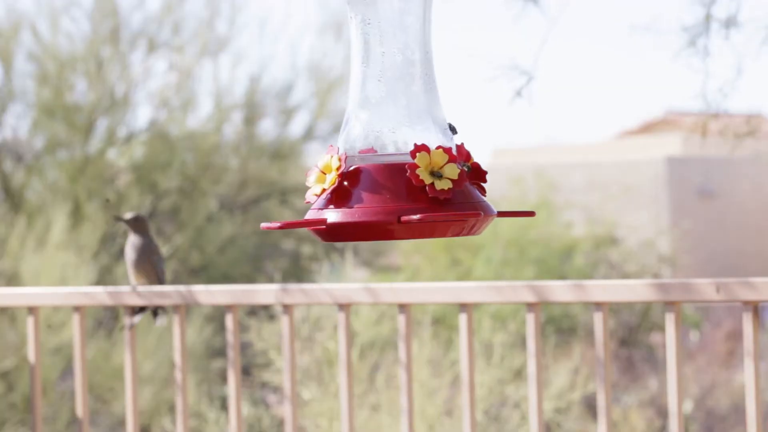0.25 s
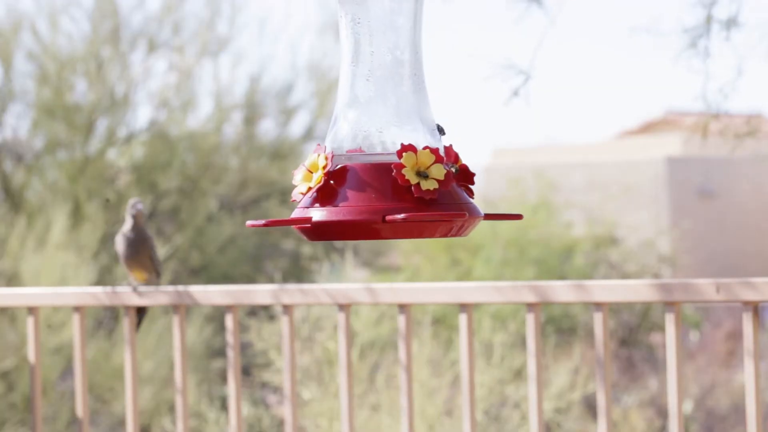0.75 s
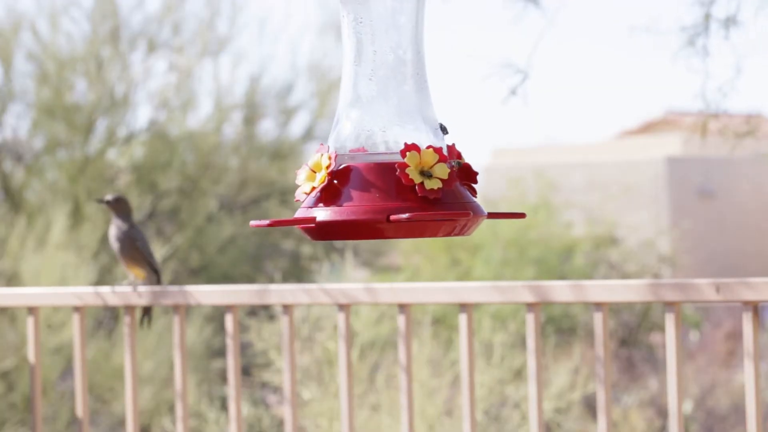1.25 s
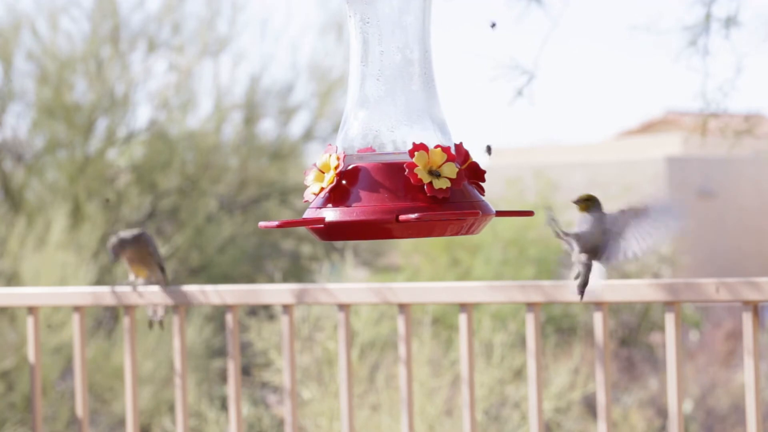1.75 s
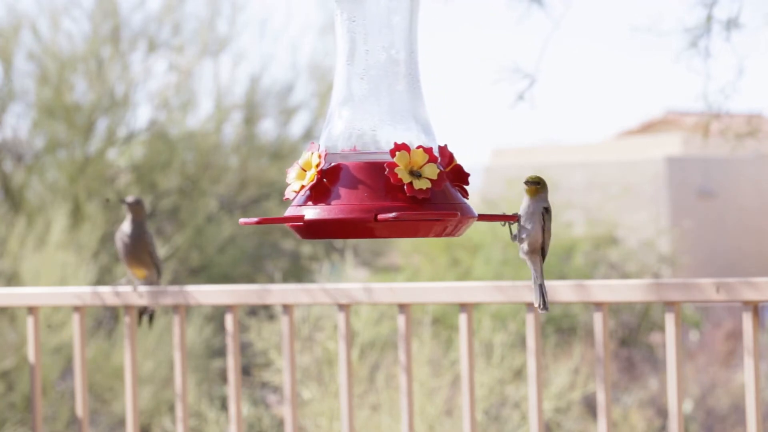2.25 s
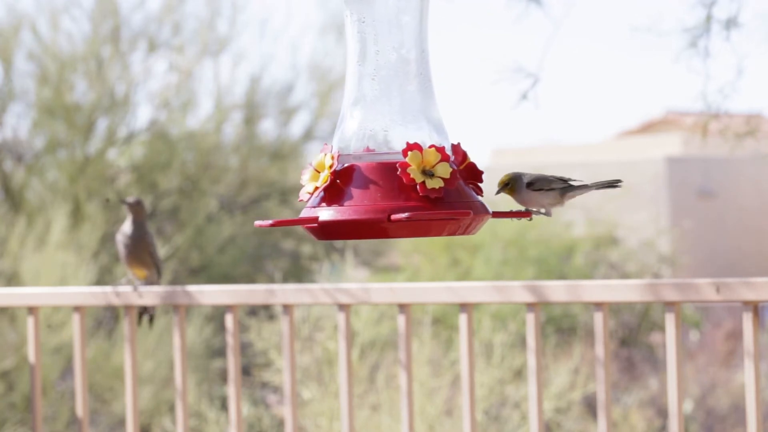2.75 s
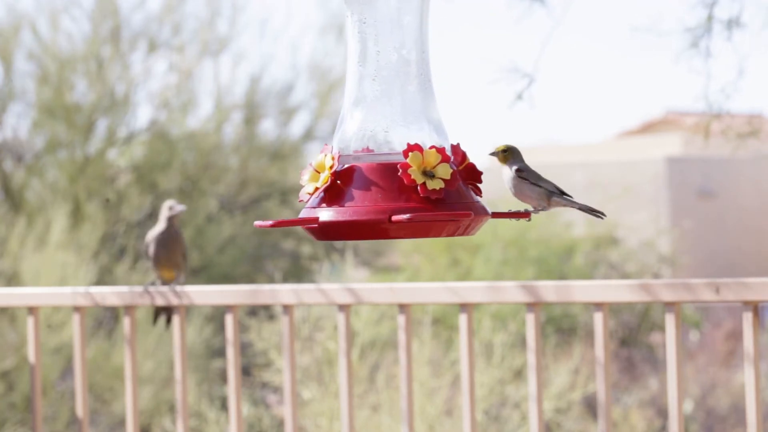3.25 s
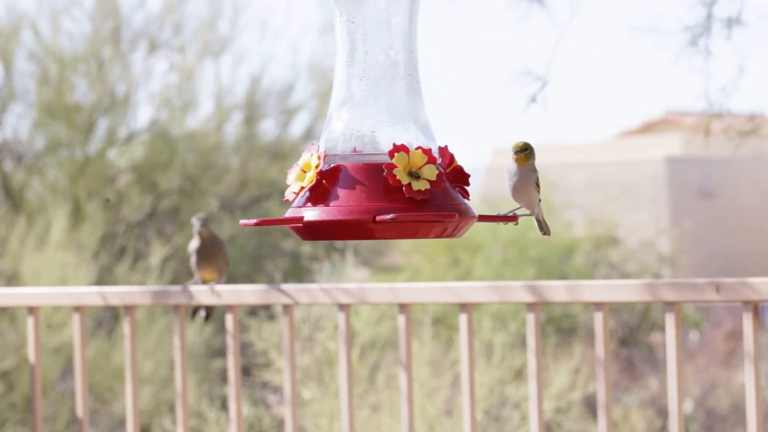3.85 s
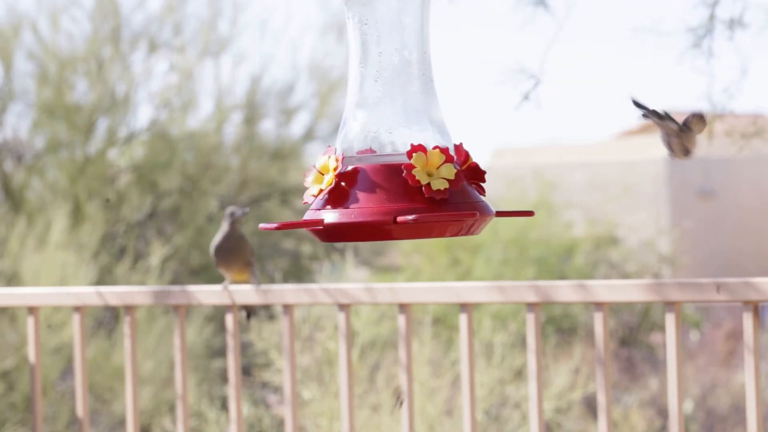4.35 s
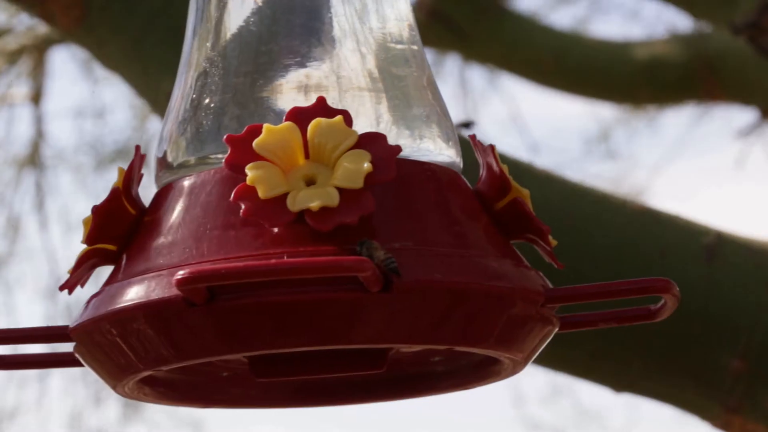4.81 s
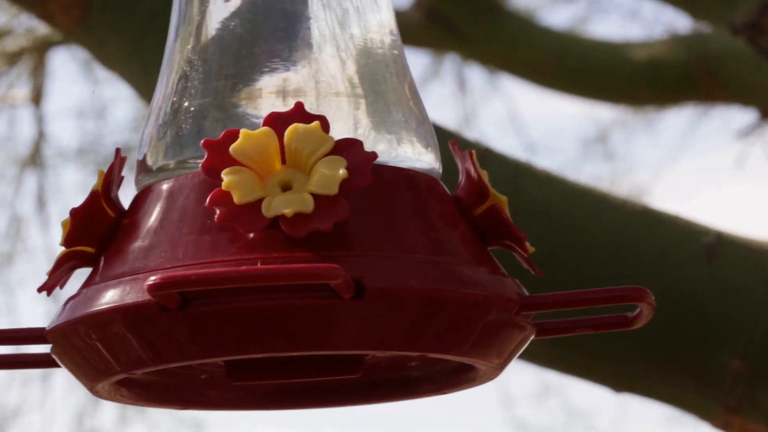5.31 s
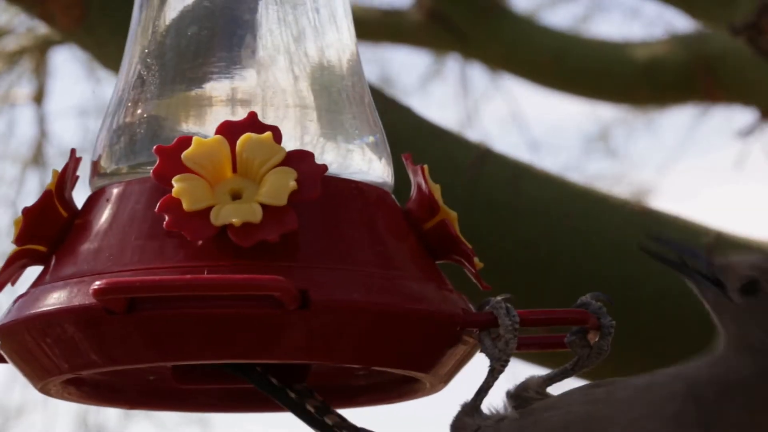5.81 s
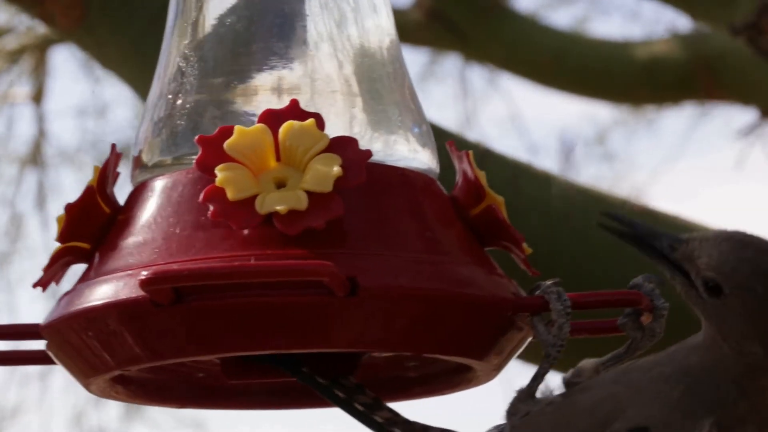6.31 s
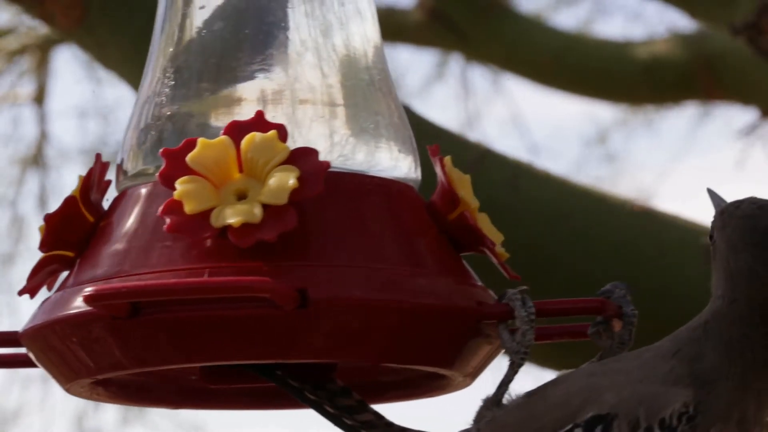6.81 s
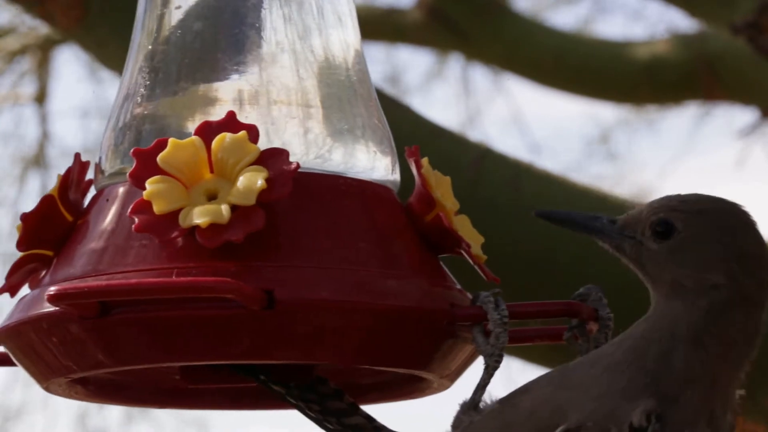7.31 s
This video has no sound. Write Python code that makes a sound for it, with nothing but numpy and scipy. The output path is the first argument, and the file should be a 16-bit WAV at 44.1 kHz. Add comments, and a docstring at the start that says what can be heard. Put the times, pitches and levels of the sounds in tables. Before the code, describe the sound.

A woodpecker yips sharply in evenly spaced series, echoing in a walled yard, with small claw ticks, light wind, then a closer, louder series.

```python
"""A woodpecker yips in three quick series in a walled yard: harmonic stacks filtered by throat and beak.
The walls return each yip as scattered echoes and a decaying tail. Small birds whistle and warble as gliding
tones, and a farther bird coos twice. Claws ring a rail, feathers rustle as noise grains and wind slaps the
microphone, over shaped noise for wind, distant traffic, a narrow drone and hiss.
The sound drops out for an instant before the last, closer series."""
import sys
import numpy as np
from scipy import signal
from scipy.io import wavfile
from scipy.ndimage import uniform_filter1d

SR = 44100
rng = np.random.default_rng(int(sys.argv[2]) if len(sys.argv) > 2 else 0)


def persist_wave(psi):
    """Save psi, clipped to +-1, as 16-bit WAV."""
    counts = np.round(np.clip(psi, -1, 1) * 32767).astype(np.int16)
    wavfile.write(sys.argv[1], SR, np.atleast_2d(counts).T)


def undo_db(level):
    """Turn decibels back into plain size, where 20 dB means ten times bigger."""
    steps = np.asarray(level, float) / 20
    return 10 ** steps


N = 333837
LEAD = SR // 2  # samples before time zero, so that an earlier yip still rings
DROPOUT_S, DROPOUT_LENGTH_S = 4.733, .006  # middle and length of the silence

# Woodpecker yips: t/s, held length/s, nominal start f/Hz, nominal top f/Hz, mid-note dip as a fraction of pitch,
# base level/dB, slope of the tail/(dB per s)
YIPS = [(-.107, 0.085, 1450, 1473, 0.04, -23.5, -700), (.155, .078, 1479, 1487, 0.02, -24, -450),
        (0.414, .072, 1427, 1505, 0.01, -23.5, -250), (.641, 0.07, 1396, 1418, 0, -20, -300),
        (0.87, 0.071, 1306, 1381, 0.01, -23, -300), (1.099, 0.074, 1331, 1376, 0.01, -23.5, -350),
        (1.339, .072, 1310, 1337, 0.02, -24.5, -400), (1.587, 0.07, 1327, 1388, 0.02, -23.5, -350),
        (1.831, .069, 1332, 1416, 0.02, -23.5, -250), (2.085, 0.072, 1345, 1343, 0.02, -25.5, -450),
        (3.196, .057, 1349, 1450, 0, -22, -450), (3.442, 0.07, 1359, 1420, 0.04, -23, -400),
        (3.687, 0.073, 1371, 1409, 0.01, -24, -300), (3.923, 0.076, 1457, 1453, 0.03, -23.5, -300),
        (4.171, .069, 1421, 1492, 0.04, -24, -250), (4.419, .072, 1400, 1505, 0.05, -24, -220),
        (5.286, .072, 1557, 1530, 0.03, -14.5, -700), (5.491, 0.084, 1453, 1539, 0.03, -15.5, -330),
        (5.723, 0.077, 1408, 1486, 0.02, -14.5, -270), (5.956, 0.074, 1464, 1524, 0.03, -14.5, -150),
        (6.185, 0.072, 1459, 1460, 0.01, -15, -200), (6.416, 0.074, 1415, 1502, 0.02, -16, -200),
        (6.655, 0.076, 1477, 1485, .01, -15.5, -300)]
# Colour of each yip, perhaps as the head turns: lift of the fundamental/dB, second harmonic/dB, treble/dB
YIP_COLOURS = [(3.5, -14, 5), (8.5, -8.5, 14.5), (6.5, -4.5, 11), (3, -10, 7.5), (5, -8.5, 9.5), (7, -7, 8),
               (8.5, -12.5, 7), (7, -9.5, 5.5), (7.5, -8, 7.5), (7, -12, 11), (8, -11, 12),
               (8.5, -8.5, 9.5), (8, -5.5, 8.5), (6.5, -5.5, 9.5), (5, -7.5, 10), (6, -5, 11),
               (-0.2, -13, 2.5), (8, -10, 1), (5, -10.5, -3.5), (6, -4.5, 3.5), (8, -6.5, 3),
               (7.5, -5.5, 5.5), (7.5, -6, 3)]
# Where those lifts apply: f/Hz of fundamental, second harmonic, main resonance (no lift), treble
LIFT_HZ = [1420, 3090, 3740, 8360]
# Resonances of throat and open beak: f/Hz, relative level/dB
THROAT = [(400, -20), (1420, -13), (2100, -3.5), (2850, -1), (4250, 1), (5700, -17), (7100, -27.5),
          (8500, -15.5), (9900, -35.5), (11400, -23), (12800, -29), (16000, -43)]
EFFORT_DB_PER_SEMITONE = 3.0  # effort raises pitch and level together
OPENING_DB, OPENING_S = -4, 0.026  # the note starts softer and fills out
FIRST_CREST, LAST_CREST = .2, 0.863  # shares of the held note; the rise levels off at the second
# Pairs below are (far, close): the pitch bends over just before the end, then drops
BEND_S, DROP_S, DROP_BEND = .005, (.015, .016), 2.41
SLACK_HZ, SINK_HZ_PER_S = 859.4, (6000, 4500)  # slack membranes sink on from there
SHUT_DB, TAIL_S = -3, (.043, .053)  # loss as the beak shuts; length of the tail
MUFFLE_S, MUFFLE_DB_PER_S = 0.017, -900  # the shut beak dulls the late tail: extra fade at 8 kHz
FAR_LOSS_DB = 5  # treble that the air takes from the far series at 12 kHz

# Decay of the yard: f/Hz, t60/s
YARD_DECAY = [(500, 0.14), (1500, 0.49), (4500, 0.35), (9000, 0.16), (15000, 0.17)]
# Wall echoes: delay/s, level before gusts and send/dB
WALLS = [(.007, -8.5), (0.054, -37), (0.109, -52), (.29, -45.5)]
CLOSE_YARD_DB = -12  # the yard is weaker against the close series

# Coos of a farther bird: t/s, length/s, start f/Hz, top f/Hz, base level/dB
COOS = [(3.91, .19, 788, 855, -42), (4.142, .19, 699, 826, -40)]
# Harmonics of a coo, from the first: mean relative level/dB
COO_ORDERS_DB = [0, -8, -15]
COO_PEAK, COO_FADE_DB = .33, -15  # share of the length where pitch and level top out; level of the long fade

# Whistled notes of small birds: t/s, length/s, start f/Hz, end f/Hz, level/dB
WHISTLES = [(1.259, 0.02, 8600, 2550, -39), (1.312, 0.013, 8300, 3700, -53.5)]
WARBLE_START_S, WARBLE_END_S = 2.865, 3.09  # first and last note onsets
WARBLE_LOW_HZ, WARBLE_HIGH_HZ, WARBLE_DB = 3300, 5100, -64  # range of starting pitch; loudest note

# Claw ticks: t/s, level/dB, ring f/Hz, treble snap against the ring before a 15 dB cut/dB
TICKS = [(.066, -35, 3240, 4.5), (.333, -34.5, 3250, -5), (1.249, -34, 3200, -16), (2.215, -30, 3340, -3),
         (2.787, -33.5, 3090, 1.5), (2.983, -33, 3130, 2), (3.402, -35, 3120, 2), (3.824, -29.5, 3440, -2),
         (3.854, -33, 3300, 4), (4.605, -34.5, 3330, 5.5), (5.105, -54, 4200, 29.5),
         (5.111, -39.5, 4140, 13), (5.626, -48, 2400, 35), (7.539, -26, 2340, -2.5),
         (7.564, -26.5, 2340, -11)]
# Modes of the rail: multiple of the ring f, relative level/dB, t60/s
RAIL_MODES = [(1.0, 0, .011), (1.13, -6, .025), (.75, -8, .008)]
# Feathers settling on the feeder
RUSTLE_START_S, RUSTLE_END_S, RUSTLE_PER_S, RUSTLE_GAIN_DB = 5.3, 5.75, 500, -62
# Wind slaps on the microphone: t/s, level/dB, f/Hz
SLAPS = [(2.352, -30, 55), (7.228, -25, 105), (7.39, -29, 110), (7.47, -28, 95), (7.53, -28, 120)]

# Course of the background: t/s, wind level/dB, traffic level/dB
AIR_LEVELS = [(0, -41.5, -50.5), (.6, -45, -50), (3.1, -45.5, -52.5), (4.101, -49, -47.5),
              (4.72, -47.5, -50), (4.74, -42.5, -48), (5.6, -47.5, -46.5), (6.8, -46, -47),
              (7.15, -41.5, -40), (7.57, -34.5, -43.5)]
# Spectrum of the wind: f/Hz, relative level per Hz/dB
WIND = [(15, -17), (45, -9), (76, -5), (113, 0), (200, -8.5), (270, -11), (400, -21.5), (800, -95)]
# Spectrum of the traffic: f/Hz, relative level/dB
TRAFFIC = [(200, -20), (300, -8), (420, 1.5), (950, 5), (1700, -4.5), (3000, -25.5), (4500, -22.5),
           (6000, -62.5)]
# Spectrum of the hiss: f/Hz, relative level/dB
HISS = [(2500, 12.5), (5500, -3), (7000, -3), (11000, 1.5), (14000, -1), (16000, -16.5)]
# Bands of the drone: f/Hz, width/Hz, relative level/dB
DRONE = [(2370, 240, 0), (3500, 160, -14), (104, 14, 8), (240, 20, 2)]
DRONE_DB, HISS_DB = (-55.5, -52), (-59.5, -60.5)  # (before, after the dropout)


def evened(x):
    """Normalisation: scales a signal to rms 1."""
    return x / np.sqrt(np.mean(x ** 2) + 1e-20)


def read(points, hz):
    """Interpolates a spectrum table along a logarithmic frequency axis."""
    f, value = np.transpose(points)
    return np.interp(np.log(hz + 1), np.log(f + 1), value)


def add(mix, s, sound):
    """Superposition: adds a sound to the mix at time s."""
    part = mix[round(s * SR) + LEAD:][:len(sound)]
    part += sound[:len(part)]


def wobble(shape, size):
    """Low-pass random modulation: twice-smoothed noise of rms 1 along the last axis."""
    smooth = uniform_filter1d(rng.standard_normal(shape), size)
    return evened(uniform_filter1d(smooth, size))


def yip(start, held, start_hz, top_hz, dip, db, fade_db, colour):
    """Source and filter: harmonics pass the throat; a hoarse start, a held note, a drop as the beak shuts."""
    close = int(start > DROPOUT_S)
    t = np.arange(0, held + TAIL_S[close], 1 / SR)
    u = np.minimum(t / held, 1)
    after = np.maximum(t - held + BEND_S, 0)

    note = start_hz + (top_hz - start_hz) * np.sin(np.pi / 2 * u / LAST_CREST)
    note *= 1 - dip * np.sin(np.pi * (u - FIRST_CREST) / (LAST_CREST - FIRST_CREST)) ** 2
    openness = np.exp(-(after / DROP_S[close]) ** DROP_BEND)
    effort_db = EFFORT_DB_PER_SEMITONE * 12 * np.log2(note / note.mean())
    level_db = db + effort_db + OPENING_DB * np.exp(-t / OPENING_S)
    level_db += SHUT_DB * (1 - openness) + fade_db * after

    sinking = SLACK_HZ - SINK_HZ_PER_S[close] * after
    pitch = openness * note + (1 - openness) * sinking
    pitch = uniform_filter1d(pitch, size=200, mode="nearest")
    slack = 1 - pitch / pitch.max()  # loose membranes jitter and hiss
    hoarse = np.exp(-t / .006)
    jitter = (.0015 + .04 * slack + .06 * hoarse) * wobble(len(t), size=40)
    pitch = pitch * (1 - .1 * hoarse + jitter)

    order = np.arange(1, 26)[:, None]
    hz = order * pitch
    beak = (1 - slack) ** (.4 if close else .2)  # resonances sink as the beak shuts
    fundamental_db, second_db, treble_db = colour
    lift = np.transpose([LIFT_HZ, [fundamental_db, second_db, 0, treble_db]])
    colour_db = read(THROAT, hz / beak) + read(lift, hz)
    colour_db -= (not close) * FAR_LOSS_DB * (hz / 12000) ** 2
    colour_db += MUFFLE_DB_PER_S * np.maximum(after - MUFFLE_S, 0) * (hz / 8000) ** 2
    colour_db -= 12 * hoarse * (hz / 8000) ** 2  # the treble comes in late

    # moving air shakes the far sound more
    flutter_db = (.5 if close else .8) * order ** .75 * wobble((25, len(t)), size=300)
    flutter_db = flutter_db - 0.1 * flutter_db.var(1, keepdims=True)  # offsets the mean power gain
    gains = undo_db(colour_db + flutter_db) * (hz < .45 * SR)
    gains /= np.sqrt((undo_db(colour_db) ** 2).sum(0) / 2)
    breath_depth = .025 + (.4 if close else .55) * slack + .9 * hoarse
    breath = 1 + breath_depth * np.sqrt(order) * wobble(gains.shape, size=12)
    phase = order * (2 * np.pi * np.cumsum(pitch) / SR + 0.281 * order)
    stack = gains * breath * np.cos(phase)
    edges = np.minimum(t / .009, 1) * np.minimum((t[-1] - t) / .022, 1)
    return start, undo_db(level_db) * stack.sum(0) * edges


def yard(x):
    """Reverberation: rough wall echoes, and a sparse random tail that decays band by band."""
    taps = np.zeros(SR)
    at = np.arange(200, SR - 20, 20)
    taps[at + rng.integers(0, 20, len(at))] = rng.choice([-1., 1.], len(at))
    hz, t, z = signal.stft(taps, SR, nperseg=256)
    decay = undo_db(-60 * t / read(YARD_DECAY, hz)[:, None])
    tail = signal.istft(z * decay, SR, nperseg=256)[1]
    tail *= undo_db(-17) / np.linalg.norm(tail)
    for delay, db in WALLS:
        scatter = rng.standard_normal(300) * np.exp(-np.arange(300) / 80)  # each wall smears over a few ms
        tail[round(delay * SR):][:300] += undo_db(db) * scatter / np.linalg.norm(scatter)
    send = np.where(np.arange(len(x)) > DROPOUT_S * SR + LEAD, undo_db(CLOSE_YARD_DB), 1)
    gusts = undo_db(3.0 * wobble(len(x), size=250))  # moving air breaks up the echoes
    return x + gusts * signal.fftconvolve(x * send, tail)[:len(x)]


def coo(s, length, start_hz, top_hz, db):
    """Additive synthesis: a few fluttering low harmonics rise to their pitch, swell and fade."""
    t = np.arange(0, length, 1 / SR)
    u = t / length
    phase = 2 * np.pi * np.cumsum(np.interp(u, [0, COO_PEAK], [start_hz, top_hz])) / SR
    swell_db = np.interp(u, [0, COO_PEAK, 2 * COO_PEAK, 1], [COO_FADE_DB / 3, 0, COO_FADE_DB, COO_FADE_DB])
    stack = np.zeros(len(t))
    for order, order_db in enumerate(COO_ORDERS_DB, 1):
        stack += undo_db(order_db + 5.9 * wobble(len(t), size=300)) * np.sin(order * phase)
    return s, undo_db(db + swell_db) * stack * np.sqrt(2) * signal.windows.tukey(len(t), .2)


def whistle(s, length, start_hz, end_hz, db):
    """Frequency glide: a nearly pure tone with a faint octave, its phase the integral of its pitch."""
    u = np.linspace(0, 1, round(length * SR))
    phase = 2 * np.pi * np.cumsum(start_hz + (end_hz - start_hz) * u ** 1.5) / SR
    tone = np.sin(phase) + .05 * np.sin(2 * phase)
    return s, undo_db(db) * np.sin(np.pi * u) ** .5 * tone * np.sqrt(2)


def warble():
    """Superposed short glides, rising first and falling later, blurred by distance as random modulation."""
    out = np.zeros(N + LEAD)
    for u, (a, b, c) in zip(np.linspace(0, 1, num=30), rng.random((30, 3))):
        s = WARBLE_START_S + u * (WARBLE_END_S - WARBLE_START_S)
        hz = WARBLE_LOW_HZ + a * (WARBLE_HIGH_HZ - WARBLE_LOW_HZ)
        note = whistle(s, .018 + .02 * b, hz, hz * (1.1 - .2 * u), WARBLE_DB - 6 * c)
        add(out, *note)
    return out * (1 + .8 * wobble(len(out), size=45))


def tick(s, db, hz, snap_db):
    """Impact excitation: a claw rings damped modes of the rail, with a bright noise snap."""
    t = np.arange(2000) / SR
    ring = np.zeros(len(t))
    for multiple, mode_db, t60 in RAIL_MODES:
        ring += undo_db(mode_db - 60 * t / t60) * np.sin(2 * np.pi * multiple * hz * t)
    snap = np.diff(rng.standard_normal(2001)) * undo_db(snap_db - 15 - 60 * t / .012)
    return s, undo_db(db) * (ring + snap) * np.minimum(t / 0.00054, 1)


def rustle():
    """Granular friction: randomly timed impulses, each a decaying puff of high-passed noise."""
    t = (np.arange(N + LEAD) - LEAD) / SR
    struck = rng.random(len(t)) < RUSTLE_PER_S / SR
    grains = struck * undo_db(2.5 * rng.exponential(1, len(t)))
    grains = grains * (t > RUSTLE_START_S) * (t < RUSTLE_END_S)
    puffs = signal.lfilter([1], [1, -.985], grains) * rng.standard_normal(len(t))
    treble = signal.butter(4, 7000, "high", fs=SR, output="sos")
    return undo_db(RUSTLE_GAIN_DB) * signal.sosfilt(treble, puffs)


def slap(s, db, hz):
    """Wind pressure: a gust pushes the membrane through a few slow, pointed swings."""
    t = np.arange(-.04, .06, 1 / SR)
    swing = np.cos(2 * np.pi * hz * t) + .5 * np.cos(2 * np.pi * 2.0 * hz * t)
    return s + t[0], undo_db(db) * swing * np.exp(-abs(t) / np.where(t < 0, .01, .018))


def noise(db_of_hz, patchy_db):
    """Spectral shaping: random short-time spectra of a given colour with drifting patches, rms 1."""
    frames, hz = N // 512 + 5, np.fft.rfftfreq(2048, 1 / SR)
    a, b, patches = rng.standard_normal((frames, 1025, 3)).T
    patches = evened(uniform_filter1d(uniform_filter1d(patches, 16, 0), 6, 1))
    z = (a + 1j * b) * undo_db(db_of_hz(hz)[:, None] + patchy_db * patches)
    return evened(signal.istft(z, nperseg=2048, noverlap=1536)[1][:N])


def drone_db(hz):
    """Resonance bands: the power of the drone's peaks adds up at each frequency."""
    power = sum(undo_db(2 * db) / (1 + (2 * (hz - f) / width) ** 4) for f, width, db in DRONE)
    return 10 * np.log10(power)


def air():
    """Broadband background: lumpy wind, traffic roar, fuzzy drone bands and hiss as shaped noise."""
    t = np.arange(N) / SR
    s, wind_db, traffic_db = np.transpose(AIR_LEVELS)
    wind = undo_db(np.interp(t, s, wind_db)) * undo_db(0.85 * wobble(N, size=1500))
    traffic = undo_db(np.interp(t, s, traffic_db))
    drone = undo_db(np.where(t < DROPOUT_S, *DRONE_DB))
    hiss = undo_db(np.where(t < DROPOUT_S, *HISS_DB))
    return (wind * noise(lambda hz: read(WIND, hz), patchy_db=0.5)
            + traffic * noise(lambda hz: read(TRAFFIC, hz) - hz / 300 * (hz > 6000), patchy_db=2.0)
            + drone * noise(drone_db, patchy_db=1.5)
            + hiss * noise(lambda hz: read(HISS, hz) - 60 * (hz < 1500), patchy_db=2.0))


def scene():
    """Direct and reverberant paths: birds ring in the yard; the other sources bypass its echoes."""
    birds, near = np.zeros((2, N + LEAD))
    for row, colour in zip(YIPS, YIP_COLOURS):
        add(birds, *yip(*row, colour))
    for row in COOS:
        add(birds, *coo(*row))
    for row in WHISTLES:
        add(birds, *whistle(*row))
    for row in TICKS:
        add(near, *tick(*row))
    for row in SLAPS:
        add(near, *slap(*row))
    mono = (yard(birds + warble()) + near + rustle())[LEAD:] + air()
    side = undo_db(-24) * signal.lfilter([1, -.8], 1, np.roll(mono, 300))  # a trace of width
    return np.array([mono + side, mono - side])


def low_pass(x):
    """Removes everything above the highest recorded frequency."""
    return signal.sosfilt(signal.butter(12, 15980, fs=SR, output="sos"), x)


def record(dry):
    """Amplitude gating: a short dropout silences the mix, with 2 ms ramps on either side."""
    distance_s = abs(np.arange(N) / SR - DROPOUT_S)
    gate = np.clip((distance_s - DROPOUT_LENGTH_S / 2) / .002, 0, 1)
    return low_pass(dry * gate)


dry = scene()
out = record(dry)
persist_wave(out)
```